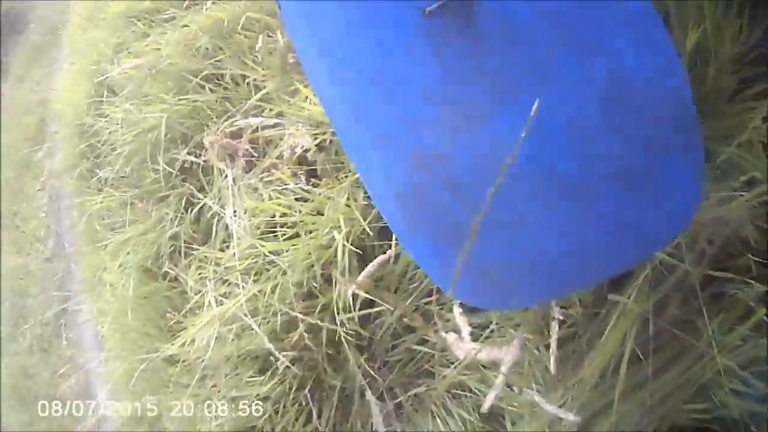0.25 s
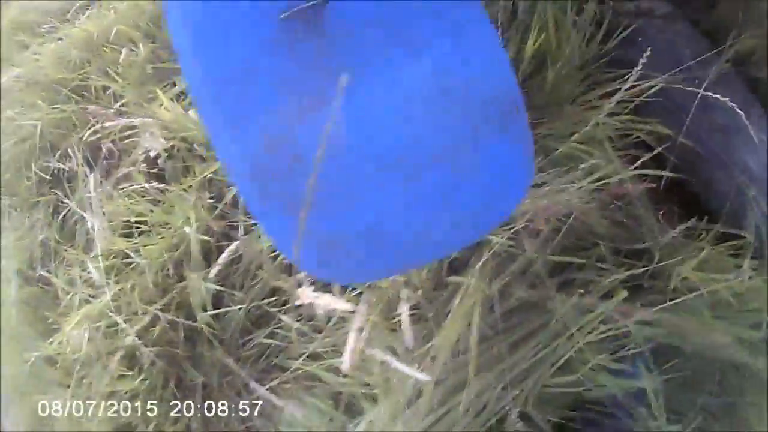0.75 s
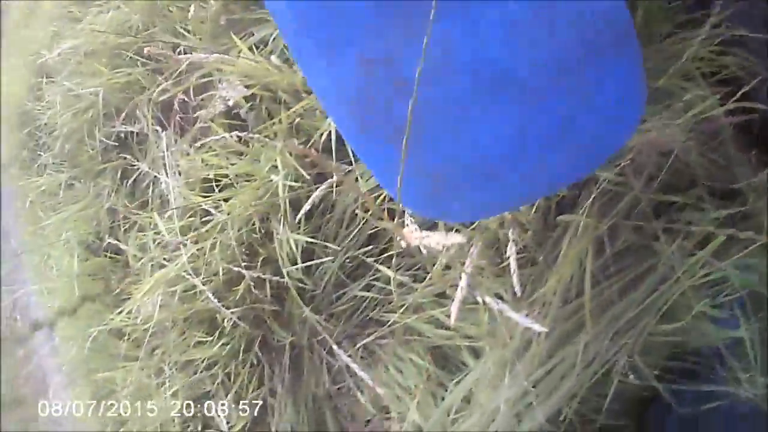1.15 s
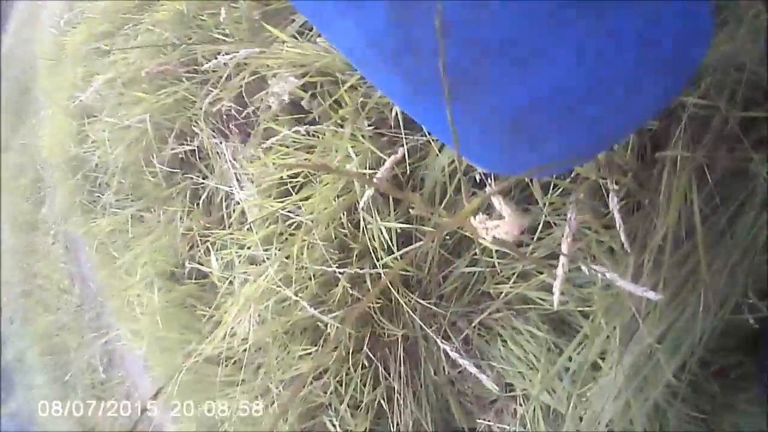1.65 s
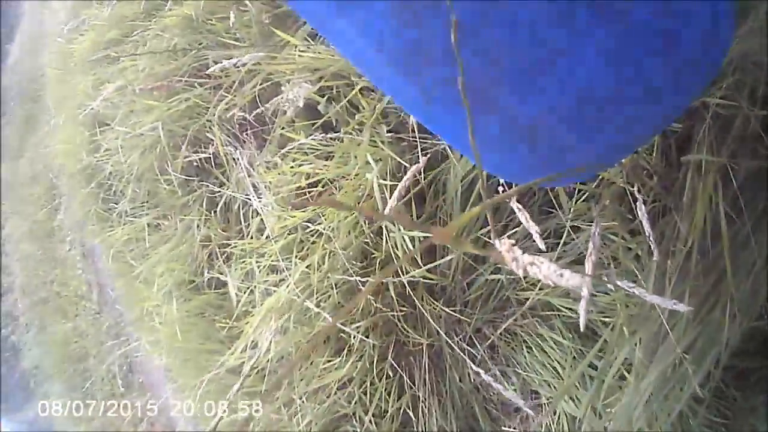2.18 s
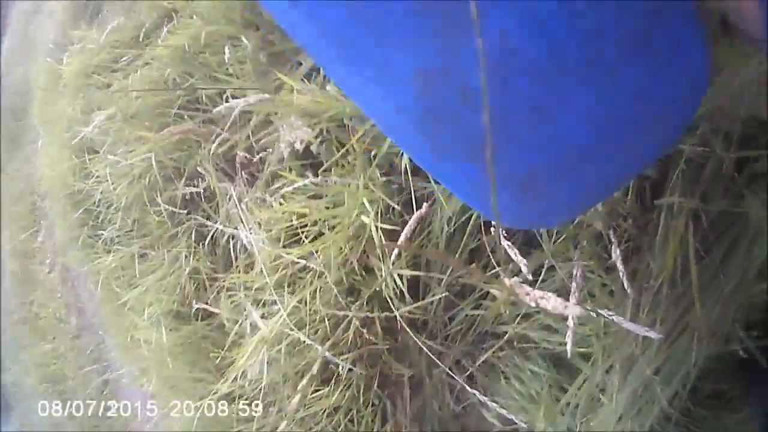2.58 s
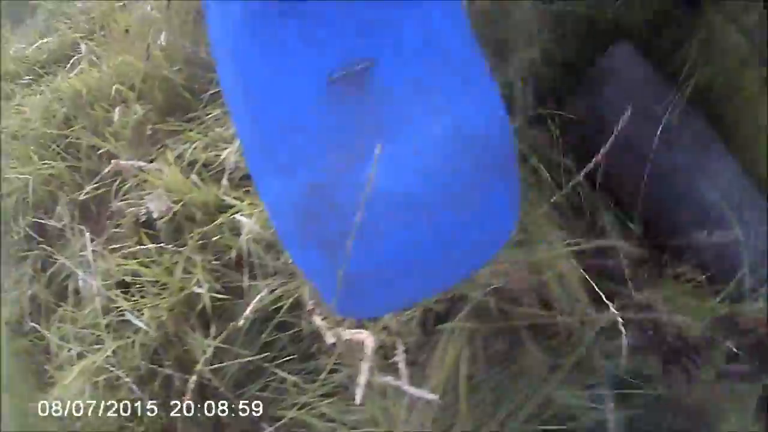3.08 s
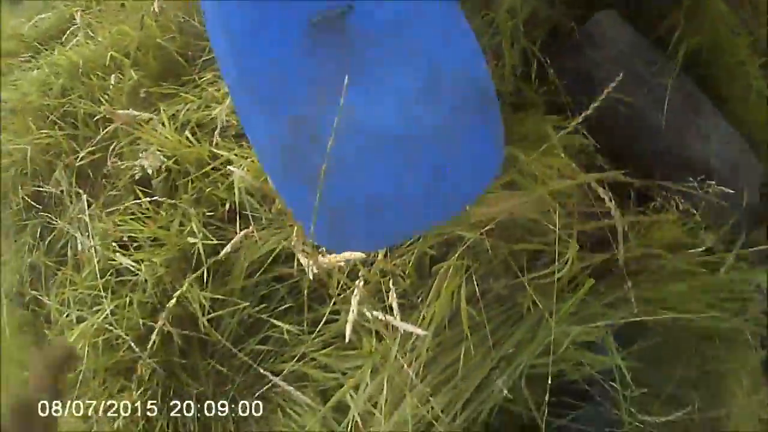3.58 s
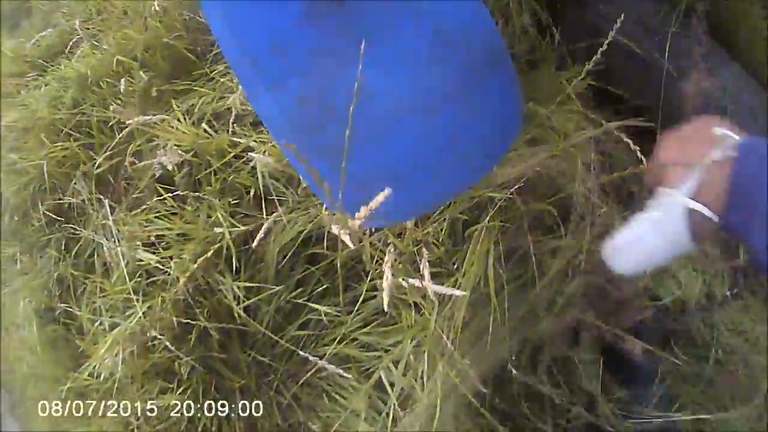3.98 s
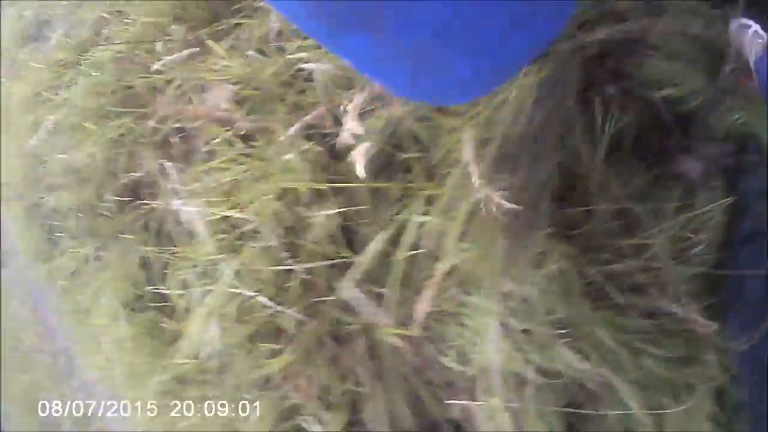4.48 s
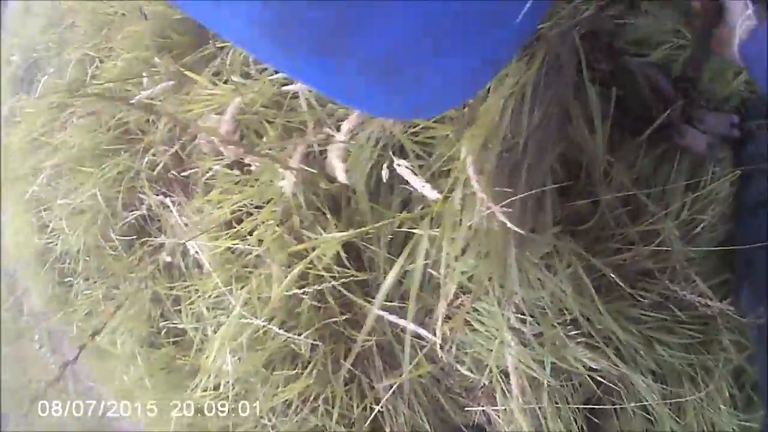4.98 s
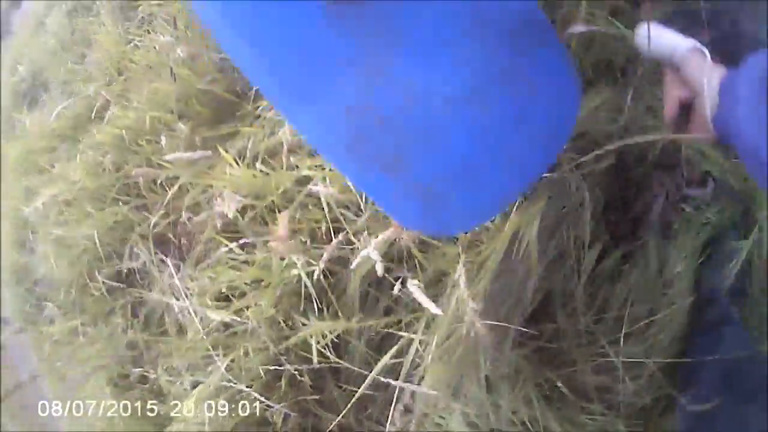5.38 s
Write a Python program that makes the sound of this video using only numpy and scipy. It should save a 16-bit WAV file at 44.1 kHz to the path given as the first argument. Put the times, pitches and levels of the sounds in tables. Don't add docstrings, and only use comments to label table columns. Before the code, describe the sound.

Close outdoor sound at a small camera above long grass. Soft cloth bumps come first over low wind rumble and faint hiss. A dense burst of buckles, hooks and chain links follows with a sharp hollow plastic knock, then a flat panel slap. After a pause, lighter clinks and a clear ringing note scatter, a few ticks follow, and a second slap lands near the end.

```python
import sys
import numpy as np
from scipy import signal
from scipy.fft import rfft, irfft
from scipy.io import wavfile
from scipy.ndimage import uniform_filter1d

SR = 44100
rng = np.random.default_rng(int(sys.argv[2]) if len(sys.argv) > 2 else 0)


def volts_from_db(level):
    exponent = np.asarray(level, float) / 20
    return 10 ** exponent


def int16_out(signal):
    q = np.round(np.clip(np.atleast_2d(signal).T, -1, 1) * 32767)
    wavfile.write(sys.argv[1], SR, q.astype(np.int16))


N = 248634

# (60 dB decay [s], free until touched [s])
TICK_RINGS = (0.037, 0.0033)


def colour(x, points):
    hz, db = np.transpose(points)
    log_hz = np.log(np.fft.rfftfreq(len(x), 1 / SR) + 1e-3)
    gain = volts_from_db(np.interp(log_hz, np.log(hz), db, left=-90, right=-90))
    y = irfft(rfft(x) * gain, len(x))
    return y / np.sqrt(np.mean(y ** 2))


def walk(rate):
    hold = int(SR / rate)
    steps = np.repeat(rng.standard_normal(N // hold + 1), hold)
    return 0.73 * uniform_filter1d(uniform_filter1d(steps, hold), hold)[:N]


def floor():
    # (frequency [Hz], level [dB per Hz])
    hiss = [(120, -61), (170, -15.5), (260, -7), (600, -11), (850, -7.5), (1100, 1), (1450, 0.5),
            (1900, -2), (2350, -11.5), (3300, -14.5), (6000, -13.5), (9300, -22), (11800, -19),
            (15600, -30)]
    whine_hz = [2826, 4240, 4258, 5691, 7080, 8484, 9911, 11386, 14137]
    # (line level [dB rms], blurred skirt level [dB rms])
    whine_levels = [(-77.5, -72.5), (-96, -77.5), (-85, -77), (-80, -113), (-105, -80), (-87, -109),
                    (-100, -87), (-103, -83), (-104, -100)]
    hiss_db = -60.5
    t = np.arange(N) / SR
    out = colour(rng.standard_normal(N), hiss) * volts_from_db(hiss_db + 0.2 * walk(1.61) + 0.85 * walk(40))
    for hz, (line_db, skirt_db) in zip(whine_hz, whine_levels):
        size = volts_from_db(line_db + 3.4 * walk(16)) + volts_from_db(skirt_db) * walk(350)
        out = out + np.sqrt(2) * size * np.sin(2 * np.pi * hz * t + 1.53 * walk(16))
    return out


def gusting(s, db, calm_db, rise, fall):
    late = np.arange(N) / SR - s[:, None]
    under_db = 10 * np.maximum(-late / rise, late / fall)
    return np.sqrt(volts_from_db(calm_db) ** 2 + np.sum(volts_from_db(db[:, None] - under_db) ** 2, axis=0))


def wind():
    # (time [s], push level [dB], rustle level [dB])
    gusts = [(.04, -65, -57.5), (.27, -55, -77), (.35, -67, -57), (.425, -50, -50), (.58, -49.5, -54.5),
             (.68, -68, -56.5), (.92, -47, -72), (1.12, -45.5, -67), (1.33, -52, -54.5),
             (1.48, -45.5, -59.5), (1.62, -57, -76), (1.895, -69, -57), (1.98, -69, -61.5),
             (2.17, -49, -74), (2.45, -55, -81), (2.83, -51.5, -62), (3.02, -58, -75), (3.2, -60, -57),
             (3.29, -50, -67), (3.42, -53, -70), (3.67, -45, -67), (3.831, -52, -81), (4.13, -67, -63.5),
             (4.25, -68, -59), (4.45, -51.5, -69), (4.81, -73, -59), (4.96, -59, -79), (5.16, -64, -62),
             (5.26, -52.5, -64), (5.43, -57, -78)]
    # (frequency [Hz], level [dB per Hz])
    push_spectrum = [(2, -8), (6, -9), (9, 2.5), (17, 3.5), (35, -1), (55, -12), (90, -19.5), (130, -32),
                     (300, -67)]
    # (frequency [Hz], level [dB per Hz])
    rustle_spectrum = [(50, 3.5), (80, 11.5), (130, -2.5), (200, 4), (350, -3), (550, -7.5), (900, -22),
                       (2000, -14.5)]
    s, push_db, rustle_db = np.transpose(gusts)
    push = colour(rng.standard_normal(N), push_spectrum) * gusting(s, push_db, -57.5, 0.044, 0.097)
    eddies = sum(volts_from_db(5.6 * walk(rate)) * rng.standard_normal(N) for rate in (14, 30))
    rustle = colour(eddies, rustle_spectrum) * gusting(s, rustle_db, -69.5, 0.055, 0.092)
    return push + volts_from_db(-3.5) * rustle


def add(out, s, db, sound):
    i = int(s * SR)
    sound = sound[:N - i]
    out[i:i + len(sound)] += volts_from_db(db) * sound / np.max(np.abs(sound))


def bumps():
    # (time [s], peak [dB], pitch [Hz])
    bump_hits = [(.316, -42, 445), (.333, -44.5, 298), (0.341, -39.5, 342), (.392, -55, 294),
                 (.417, -51, 490), (0.425, -39.5, 173), (0.434, -49, 300), (.47, -59, 250),
                 (0.519, -40.5, 300), (.535, -49, 250), (.56, -49.5, 346), (0.595, -51, 225),
                 (1.469, -47.5, 210), (1.89, -52, 287), (3.099, -58, 286), (3.181, -54.5, 230),
                 (3.225, -58, 455), (3.244, -59, 257), (3.369, -52, 300), (3.399, -50, 231),
                 (3.489, -55, 165), (3.524, -51.5, 229), (4.131, -59, 211), (4.222, -52, 432),
                 (4.239, -60, 283), (4.3, -58, 260), (4.35, -54, 219), (5.1, -55, 200), (5.181, -50, 453),
                 (5.201, -41.5, 472)]
    # (time [s], peak [dB], pitch [Hz], fade [s])
    thump = (.3422, -36, 100, .022)
    firm_db, firm_t60, doubles_db = -41, 0.025, 15.5
    out, t = np.zeros(N), np.arange(SR // 8) / SR
    snap_band = signal.butter(2, (500, 2000), "bandpass", fs=SR, output="sos")
    for s, db, hz in bump_hits:
        t60 = firm_t60 * 2 ** ((firm_db - db) / doubles_db)
        dull_band = signal.butter(2, (2.13 * hz, 3.35 * hz), "bandpass", fs=SR, output="sos")
        scuff = signal.sosfilt(dull_band, rng.standard_normal(len(t)))
        snap = signal.sosfilt(snap_band, rng.standard_normal(len(t))) * np.exp(-t / 0.0027)
        push = np.sin(2 * np.pi * hz * t) + volts_from_db(5) * scuff + volts_from_db(5) * snap
        fade = np.exp(-np.log(1000) * t / max(t60, .005))
        add(out, s, db, push * (1 - np.exp(-t * hz * 5.7)) * fade)
    s, db, hz, fade = thump
    add(out, s, db, np.sin(2 * np.pi * np.minimum(hz * t, 1)) * np.exp(-t / fade))
    return out


def ringing(t, modes, hz, t60, reach, rest_db):
    level_chance, pitch_chance, sign_chance = rng.standard_normal((3, len(modes)))
    f, db = np.transpose(modes)
    near = np.exp(-(np.log(f / hz) / reach) ** 2) + volts_from_db(rest_db)
    gain = volts_from_db(db + 2 * level_chance) * near * np.sign(sign_chance)
    f = f * (1 + .0012 * pitch_chance)
    return gain @ np.sin(2 * np.pi * f[:, None] * t) * np.exp(-np.log(1000) * t / max(t60, .005))


def contacts(t, length, db, rise):
    small = volts_from_db(2.8 * rng.exponential(size=len(t))) * rng.standard_normal(len(t))
    small = small * np.exp(-t / max(length, .001))
    blow = t * np.exp(-t / rise)
    return volts_from_db(db) * small / np.linalg.norm(small) + blow / np.linalg.norm(blow)


def clinks(hits, modes, reach, rest_db, chatter_db, tick_db):
    out, t = np.zeros(N), np.arange(SR // 4) / SR
    band_hz = modes[0][0] * .75, min(modes[-1][0] * 1.06, 16000)
    around = signal.butter(3, band_hz, "bandpass", fs=SR, output="sos")
    for s, db, hz, t60, free in hits:
        tone = ringing(t, modes, hz, t60, reach, rest_db)
        tone = signal.fftconvolve(tone, contacts(t, free, chatter_db, .00002))[:len(t)]
        damping = np.exp(-np.maximum(t - free, 0) / 0.0093)
        tone = tone / np.max(np.abs(tone)) * (1 - np.exp(-t / 0.0011)) * damping
        tick = signal.sosfilt(around, rng.standard_normal(len(t))) * np.exp(-t / 0.0083)
        add(out, s, db, tone + volts_from_db(tick_db) * tick)
    return out


def pins():
    # (time [s], peak [dB], struck pitch [Hz])
    pin_hits = [(.3994, -72, 12300), (1.2615, -66, 12100), (1.3085, -64, 13500), (1.322, -62, 13500),
                (1.326, -59, 14200), (1.3444, -61, 14200), (1.345, -66, 15100), (1.355, -66, 13500),
                (1.475, -68, 14200), (1.4394, -67, 15100), (1.4594, -68, 13500), (3.5244, -67, 12200),
                (3.8744, -67, 12300), (4.2844, -70, 14750), (4.5594, -73, 14300)]
    # (60 dB decay [s], free until touched [s])
    pin_rings = (.13, 0.028)
    # (frequency [Hz], level [dB])
    pin_modes = [(12200, -8), (13500, -2), (14220, 0), (14750, -8), (15120, -2), (15590, -6)]
    hits = [(*hit, *pin_rings) for hit in pin_hits]
    return clinks(hits, pin_modes, .02, -15, -3, -20)


def buckles():
    # (time [s], peak [dB], struck pitch [Hz], free until touched [s])
    buckle_hits = [(1.0016, -66, 9900, .02), (1.0194, -60, 10300, .02), (1.067, -62, 10600, .02),
                   (1.1049, -54.5, 10400, 0.022), (1.1493, -65, 10300, .02), (1.246, -61, 10900, .006),
                   (1.26, -48, 10340, .01), (1.263, -51, 10900, .01), (1.275, -49, 10000, .012),
                   (1.285, -56, 11070, .01), (1.2974, -45, 10100, 0.016), (1.299, -49, 10900, .012),
                   (1.3194, -39.5, 10340, 0.011), (1.326, -44.5, 11000, .008), (1.336, -47, 10020, .01),
                   (1.345, -55, 10900, .01), (1.352, -53, 10190, 0.015), (1.3694, -58, 10100, .01),
                   (1.376, -58, 11000, .02), (1.3844, -61, 9870, .01), (1.398, -60, 9480, 0.026),
                   (1.4338, -47, 10800, .012), (1.436, -48, 9950, .01), (1.446, -46, 10200, .008),
                   (1.456, -39, 9840, .014), (1.457, -51, 10900, .012), (1.474, -52, 10200, .01),
                   (1.482, -54, 10770, 0.017), (1.499, -49.5, 10200, .02), (1.524, -60, 11070, .006),
                   (1.526, -61, 10020, .015), (1.5524, -55, 10190, .008), (1.565, -60, 10000, .008),
                   (1.5958, -63, 10200, .015), (3.2375, -42, 9600, 0.016), (3.254, -60, 10200, .018),
                   (3.2634, -56, 9600, .006), (3.272, -56, 9600, .008), (3.2924, -50, 10160, .012),
                   (3.2935, -53, 9600, .025), (3.312, -54, 10100, .012), (3.322, -55, 10900, 0.0067),
                   (3.3465, -40, 9980, 0.017), (3.349, -51, 10700, .007), (3.361, -52, 10600, .006),
                   (3.3694, -61, 11200, .004), (3.4461, -62, 9480, .022), (4.562, -53, 10900, .02),
                   (4.5755, -47, 10600, 0.034), (4.9294, -65, 9870, .015)]
    # (time [s], peak [dB], struck pitch [Hz])
    buckle_ticks = [(3.1916, -62, 9600), (3.2176, -60, 9540), (3.225, -64, 10200), (3.236, -60, 10700),
                    (3.88, -64, 9600), (3.895, -64, 9600), (3.4082, -63, 10300), (3.704, -57, 10100),
                    (3.7953, -59, 10100), (3.8711, -60, 10200), (4.6194, -62, 10700), (4.7875, -67, 9920),
                    (4.847, -60, 10200)]
    # (frequency [Hz], level [dB])
    buckle_modes = [(9480, -6), (9600, 0), (9870, 0), (10020, -3), (10190, 0), (10350, -5), (10640, -2),
                    (10770, -4), (10900, -1), (11070, -2)]
    t60 = 0.11
    hits = [(s, db, hz, t60, free) for s, db, hz, free in buckle_hits]
    hits += [(*tick, *TICK_RINGS) for tick in buckle_ticks]
    return clinks(hits, buckle_modes, .013, -18, -4, -14)


def hooks():
    # (time [s], peak [dB], struck pitch [Hz])
    hook_hits = [(1.0715, -54.5, 3150), (1.1109, -59, 3020), (1.2414, -44.5, 3480), (1.2451, -50, 3700),
                 (1.251, -51, 3790), (1.256, -51, 3780), (1.262, -47, 3010), (1.2664, -50, 3780),
                 (1.287, -51, 3780), (1.297, -48, 3300), (1.346, -53, 3010), (1.356, -54, 3010),
                 (1.44, -55, 3300), (1.452, -46, 3010), (1.4604, -53, 3450), (1.478, -52, 3000),
                 (1.5065, -57.5, 3700), (1.5244, -58, 3480), (1.56, -68, 3300), (3.2375, -55, 3070),
                 (3.2914, -50, 3020), (3.3094, -51.5, 3010), (3.7324, -43, 3670), (3.735, -50, 4400),
                 (3.7444, -48.5, 3820), (4.172, -61, 3780), (4.2343, -57, 5100)]
    # (60 dB decay [s], free until touched [s])
    hook_rings = (0.04, 0.024)
    # (frequency [Hz], level [dB])
    hook_modes = [(3010, -7), (3300, -5), (3480, -8), (3620, 0.5), (3780, 3.5), (4400, -8), (5100, -1)]
    hits = [(*hit, *hook_rings) for hit in hook_hits]
    return clinks(hits, hook_modes, 0.028, -19, -3, -10)


def steel_ring():
    # (time [s], peak [dB], 60 dB decay [s], free until touched [s])
    ring_hits = [(1.089, -57, 0.37, 0.036), (1.314, -45.5, .3, 0.016), (1.324, -46.5, .3, 0.017),
                 (1.351, -44.5, 0.19, 0.07), (1.509, -65, .15, .015), (3.238, -60, .05, .004),
                 (3.332, -59, .05, .004), (3.345, -61, .05, .006), (3.365, -62, .4, 0.07),
                 (3.407, -60, .05, .004), (3.444, -52, 0.055, .022), (3.524, -41, 0.24, 0.012),
                 (3.556, -52.5, 1.7, 0.052), (3.783, -67, .1, .012), (3.848, -50.5, 0.021, 0.0082),
                 (3.87, -59, .25, 0.036), (4.103, -55, 0.1, 0.02), (4.138, -60.5, 0.18, 0.038),
                 (4.6, -70, 2.5, 0.17)]
    # (frequency [Hz], level [dB])
    ring_modes = [(5850, -18), (5938, 0), (5978, -12)]
    struck_hz = 5960
    hits = [(s, db, struck_hz, t60, free) for s, db, t60, free in ring_hits]
    return clinks(hits, ring_modes, .03, -14, -5, -28)


def links():
    # (time [s], peak [dB], struck pitch [Hz], free until touched [s])
    link_hits = [(1.1104, -63, 8750, .03), (1.242, -66, 8250, .004), (1.266, -59, 7965, .005),
                 (1.286, -57, 7965, .01), (1.297, -59, 8570, .006), (1.3074, -53, 8570, .008),
                 (1.3199, -51, 8570, .018), (1.323, -48.5, 7965, .01), (1.336, -51, 7965, .025),
                 (1.431, -59.5, 7280, 0.047), (1.433, -62, 7965, .01), (1.447, -60, 8570, .006),
                 (1.4546, -57, 7965, .012), (1.456, -58, 8570, .014), (1.482, -55, 7965, 0.025),
                 (1.508, -62, 7280, .008), (3.2375, -58, 8200, .003), (3.242, -59, 8570, .014),
                 (3.255, -66, 7965, .015), (3.2984, -54, 7965, .01), (3.306, -62, 8570, .008),
                 (3.316, -57, 8570, .01), (3.325, -59, 7965, .007), (3.335, -60, 8570, .015),
                 (3.338, -65, 7965, .008), (3.35, -60, 7965, .015), (4.559, -55, 7950, .03),
                 (4.5635, -51, 7960, 0.034)]
    # (time [s], peak [dB], struck pitch [Hz])
    link_ticks = [
        (3.4431, -57, 7950),
        (3.6481, -58, 8960),
        (3.832, -61, 7965),
        (4.1764, -55.5, 9040),
        (4.2344, -64, 9050),
        (4.2994, -66, 9050),
        (4.3655, -54.5, 7650),
    ]
    # (frequency [Hz], level [dB])
    link_modes = [(7280, -3), (7500, -12), (7965, 0), (8200, -14), (8570, -3), (9050, -8)]
    t60 = 0.15
    hits = [(s, db, hz, t60, free) for s, db, hz, free in link_hits]
    hits += [(*tick, *TICK_RINGS) for tick in link_ticks]
    return clinks(hits, link_modes, .015, -23, -4, -15)


def struck_guard(hits, t60, reach, rest_db, rattle_db, rise):
    # (frequency [Hz], level [dB])
    guard_modes = [(600, -23), (770, 0.5), (1095, 0), (1165, 9.5), (1365, 0.5), (1520, 2), (1750, 3.5),
                   (1950, -0.5), (2230, 3), (2750, -4), (3250, 2.5), (3800, -0.5), (4350, -7), (5100, -15)]
    out, t = np.zeros(N), np.arange(SR // 4) / SR
    bright = signal.butter(4, (2500, 8500), "bandpass", fs=SR, output="sos")
    thin = signal.butter(3, 520, "highpass", fs=SR, output="sos")
    for s, db, hz, rattle, crack_db in hits:
        shell = ringing(t, guard_modes, hz, t60, reach, rest_db)
        share_db = rattle_db + 14 * np.log10(rattle / 0.0015)
        body = signal.fftconvolve(contacts(t, rattle, share_db, .00003), shell)[:len(t)]
        body = signal.sosfilt(thin, body * (1 - np.exp(-t / rise)))
        crack = signal.sosfilt(bright, rng.standard_normal(len(t))) * np.exp(-t / max(rattle, .001))
        add(out, s, db, body / np.max(np.abs(body)) + volts_from_db(crack_db) * crack)
    return out


def knocks():
    # (time [s], peak [dB], struck pitch [Hz], rattle [s], crack level [dB])
    knock_hits = [(1.2305, -47, 1750, .002, -25), (1.2415, -41.5, 2230, 0.023, 1),
                  (1.248, -42, 1380, 0.0084, -16), (1.2592, -32.5, 1520, 0.002, -19),
                  (1.2615, -32.5, 2230, 0.002, -18), (1.268, -37, 1165, .003, -20),
                  (1.3082, -20.5, 1330, 0.0012, -22), (1.3085, -29.5, 2230, 0.0011, -6),
                  (1.309, -44, 3250, .001, -14), (1.3102, -26, 1440, 0.0011, -22),
                  (1.3135, -30.5, 1165, 0.0012, -10), (1.318, -27, 1140, 0.0016, -16),
                  (1.3205, -35, 3250, 0.0022, -5), (1.3245, -34, 1340, 0.0018, -20),
                  (1.33, -44, 1200, 0.003, -17), (1.336, -36.5, 1900, 0.003, -18),
                  (1.341, -43, 1210, 0.012, -18), (1.505, -44.5, 1500, 0.024, -10),
                  (1.555, -45, 1380, 0.011, -20), (3.49, -48, 1500, .01, -11),
                  (3.734, -42, 1750, 0.011, -5), (4.56, -47.5, 2750, 0.0044, -8)]
    return struck_guard(knock_hits, 0.032, 0.074, -7.5, -8, 0.00036)


def tocks():
    # (time [s], peak [dB], struck pitch [Hz])
    tock_hits = [
        (1.255, -49, 5100),
        (1.262, -44, 5100),
        (1.2835, -40, 1500),
        (1.291, -44, 1175),
        (4.21, -40.5, 1090),
        (4.841, -49, 1140),
    ]
    rattle, crack_db = .002, -33
    hits = [(*hit, rattle, crack_db) for hit in tock_hits]
    return struck_guard(hits, .04, .045, -32, -14, .0012)


def slaps(noise_db, rattle_db, struck_db):
    # (time [s], peak [dB], struck pitch [Hz], rattle [s], tilt [dB per octave])
    slap_hits = [(1.959, -34, 940, 0.0032, -2.5), (1.9596, -37, 8200, 0.0088, 9),
                 (1.96, -50, 477, 0.016, 0), (1.961, -36.5, 3780, .002, 2), (1.968, -40, 6700, 0.0085, 4),
                 (1.975, -35.5, 980, 0.0074, -10), (1.9845, -37.5, 1040, 0.0068, -4.5),
                 (1.9853, -37, 3780, 0.014, -1), (1.996, -49, 417, 0.011, -2), (1.99, -52, 2000, .006, 1),
                 (2.007, -49, 880, .03, -8), (2.075, -51, 872, 0.0055, -8), (4.87, -36, 830, 0.0054, -5),
                 (4.8706, -40, 3400, 0.0026, -4), (4.871, -32.5, 2240, 0.006, -3.5),
                 (4.873, -45, 6300, .01, 14), (4.881, -37, 3320, .015, -3),
                 (4.889, -38.5, 1900, 0.026, -4.5), (4.903, -46.5, 1900, 0.04, -9.5)]
    # (frequency [Hz], level [dB], 60 dB decay [s])
    bed_modes = [(399, -19, 0.28), (432, -17, 0.19), (515, -20.5, 0.2), (817, -1.5, 0.079),
                 (855, -33, 0.15), (880, -20, 0.66), (1127, -4, 0.073), (1500, -5, 0.097), (1900, -8, 0.24),
                 (9600, -9, 0.047), (2240, 2, 0.098), (3400, -8, 0.04), (3780, -3.5, 0.06), (6210, 2, .07),
                 (6665, -8, 0.094), (8100, 4, 0.03), (8480, -1, 0.034), (10900, -4, 0.036)]
    # (frequency [Hz], level [dB per Hz])
    bed_noise = [(180, -40), (300, -18), (813, 0.5), (1320, -2.5), (2240, 0.5), (2720, -6.5), (3690, 3.5),
                 (4190, -9.5), (6070, -1.5), (6900, -3), (7360, -36), (8240, -13), (9070, -31),
                 (10800, -7.5), (14000, -58)]
    out, t = np.zeros(N), np.arange(SR // 2) / SR
    f, mode_db, t60 = np.transpose(bed_modes)[:, :, None]
    thin = signal.butter(4, 330, "highpass", fs=SR, output="sos")
    for s, db, hz, rattle, tilt_db in slap_hits:
        near_db = struck_db * np.exp(-(np.log(f / hz) / 0.27) ** 2)
        gain = volts_from_db(mode_db + near_db + tilt_db * np.log2(f / 2000))
        gain = gain * np.sign(rng.standard_normal(f.shape))
        panel = np.sum(gain * np.sin(2 * np.pi * f * t) * np.exp(-np.log(1000) * t / t60), axis=0)
        panel = signal.fftconvolve(contacts(t, rattle, rattle_db, .00002), panel)[:len(t)]
        tilted = [(f_hz, n_db + 0.52 * tilt_db * np.log2(f_hz / 2000)) for f_hz, n_db in bed_noise]
        fade = np.exp(-t / rattle) + 0.075 * np.exp(-t / 0.045)
        crowd = colour(rng.standard_normal(len(t)), tilted) * fade
        blow = panel / np.max(np.abs(panel)) + volts_from_db(noise_db) * crowd
        add(out, s, db, signal.sosfilt(thin, blow * (1 - np.exp(-t / .0004))))
    return out


def scene():
    air = floor() + wind()
    metal = pins() + buckles() + hooks() + steel_ring() + links()
    guard = knocks() + tocks()
    return (air + bumps() + metal + guard + slaps(-4.0, -4.0, 10.3))[None]


def band_limit(x):
    return signal.sosfilt(signal.butter(12, 15610, fs=SR, output="sos"), x)


def record(dry):
    offset = -.042
    top = signal.ellip(8, .2, 60, 15600, fs=SR, output="sos")
    mix = signal.sosfilt(top, dry) + offset
    return band_limit(mix)


dry = scene()
out = record(dry)
int16_out(out)
```